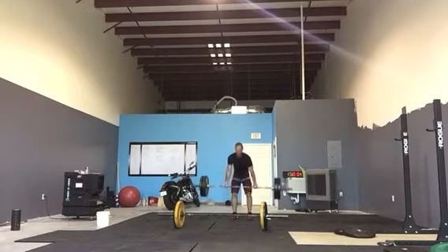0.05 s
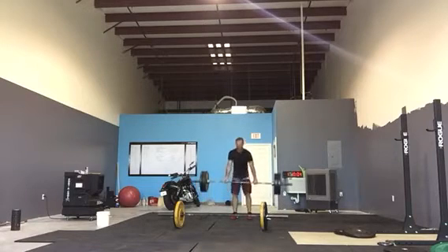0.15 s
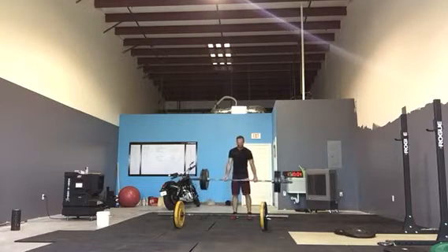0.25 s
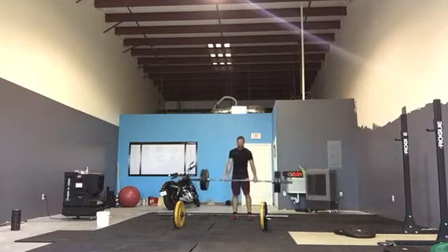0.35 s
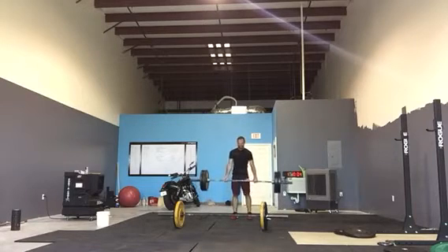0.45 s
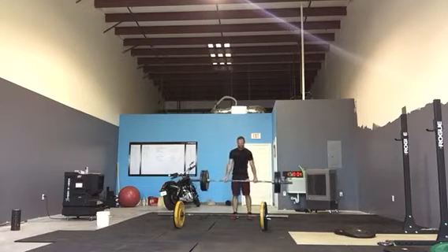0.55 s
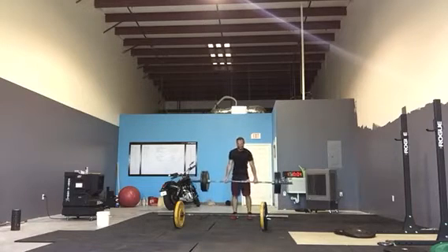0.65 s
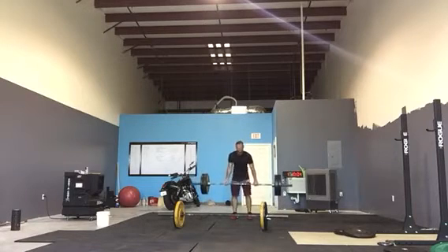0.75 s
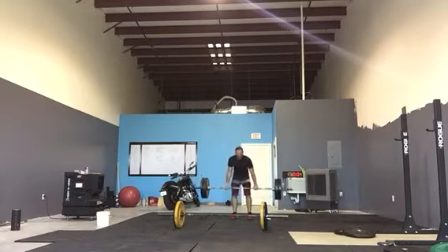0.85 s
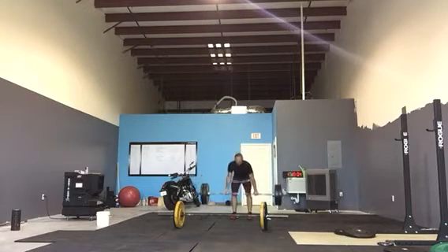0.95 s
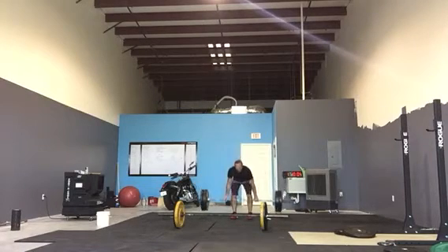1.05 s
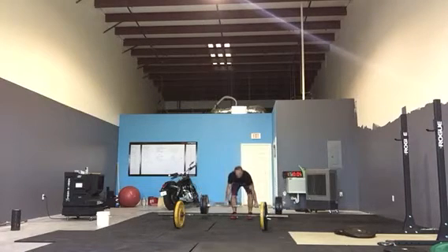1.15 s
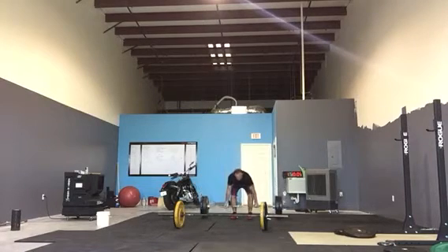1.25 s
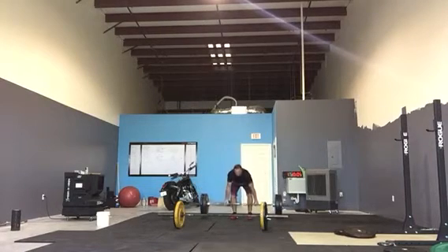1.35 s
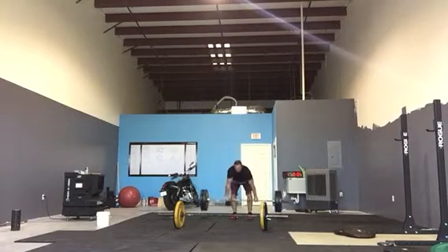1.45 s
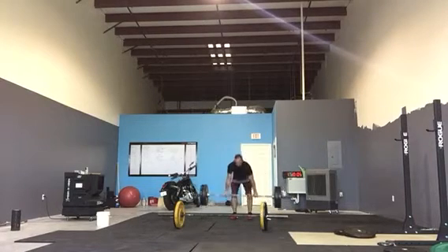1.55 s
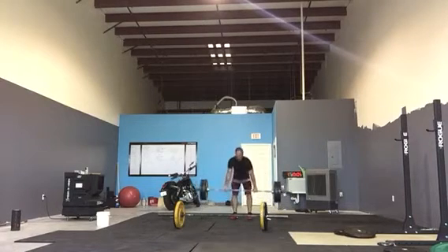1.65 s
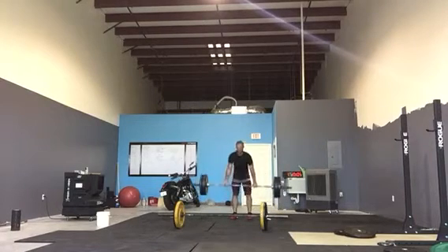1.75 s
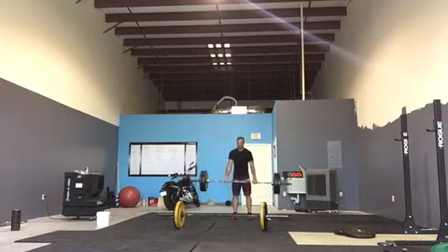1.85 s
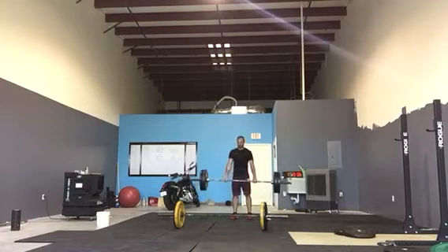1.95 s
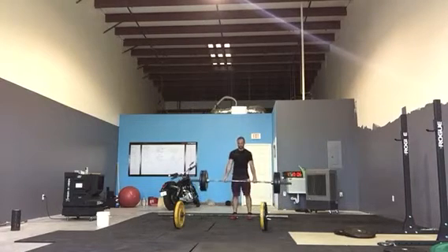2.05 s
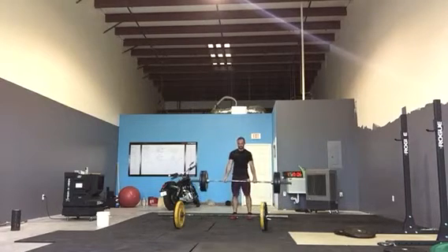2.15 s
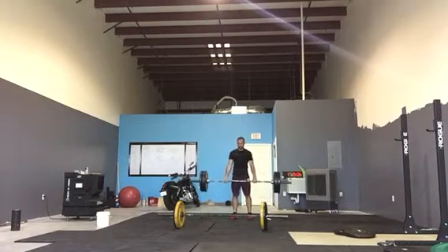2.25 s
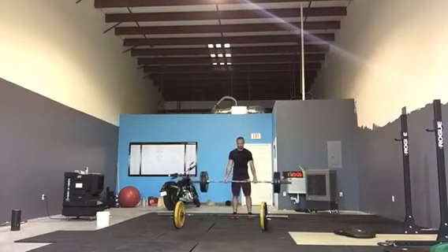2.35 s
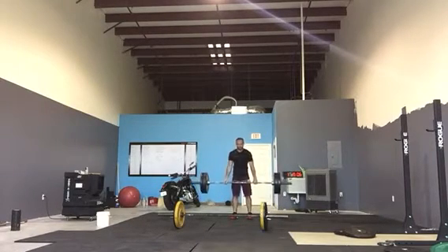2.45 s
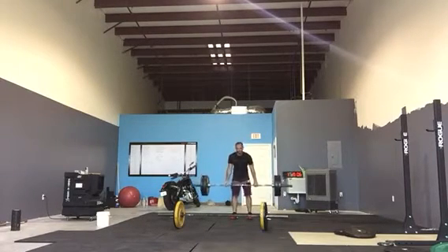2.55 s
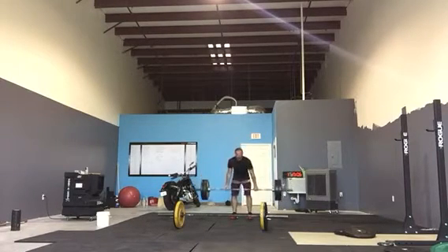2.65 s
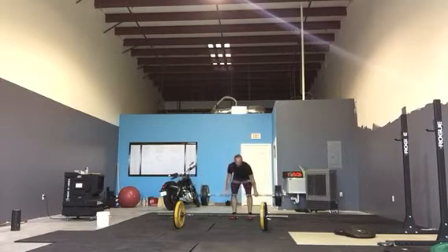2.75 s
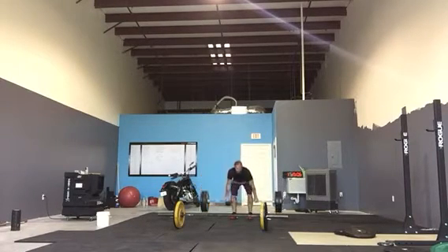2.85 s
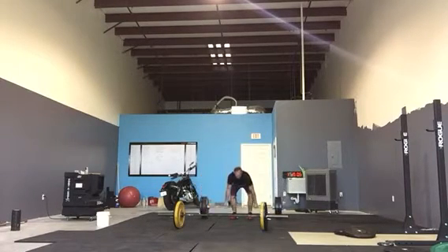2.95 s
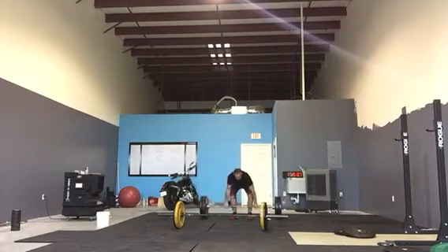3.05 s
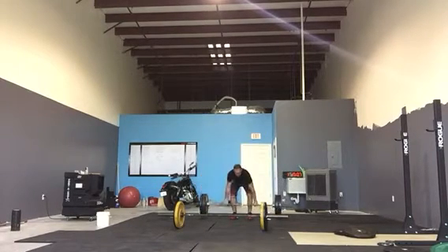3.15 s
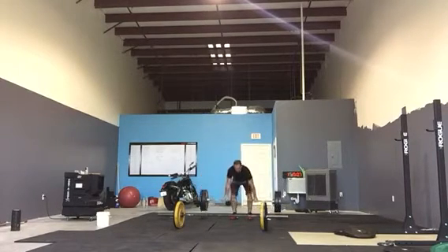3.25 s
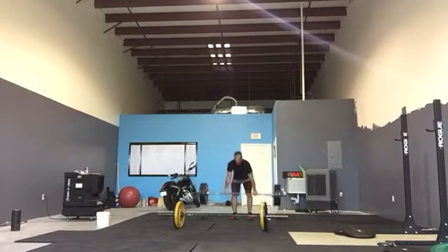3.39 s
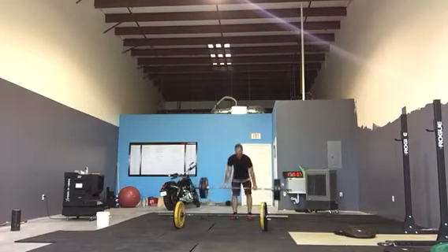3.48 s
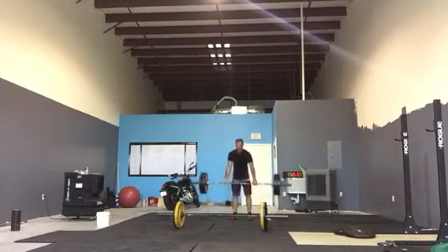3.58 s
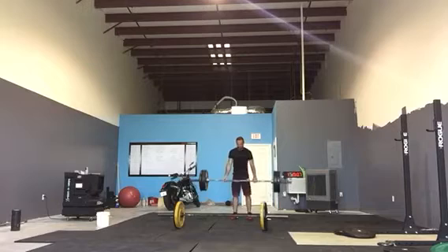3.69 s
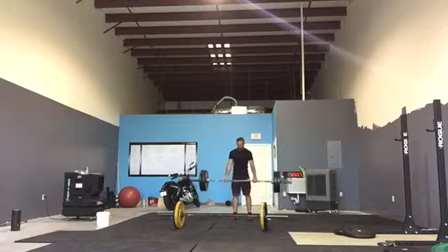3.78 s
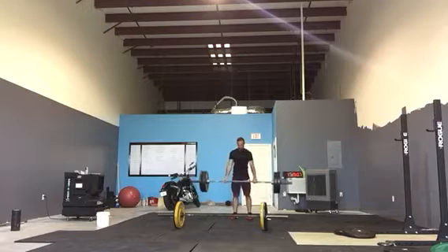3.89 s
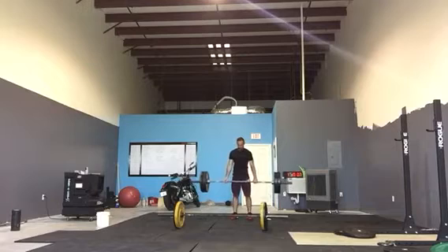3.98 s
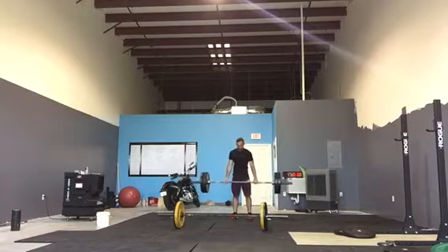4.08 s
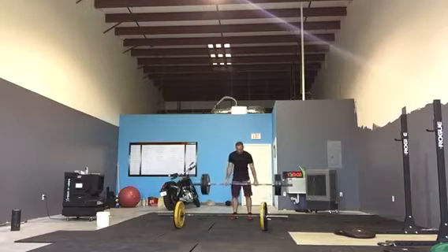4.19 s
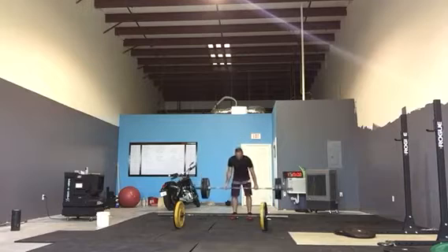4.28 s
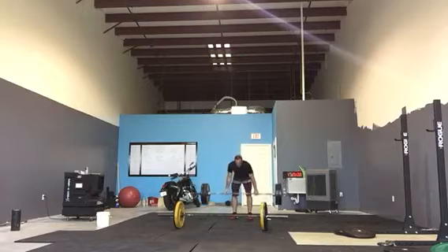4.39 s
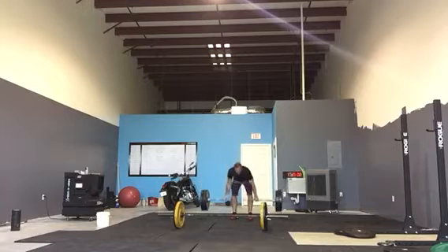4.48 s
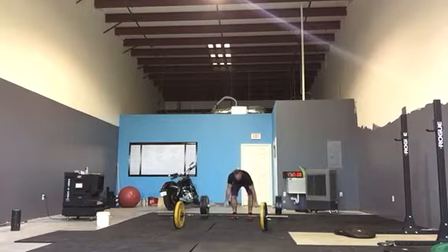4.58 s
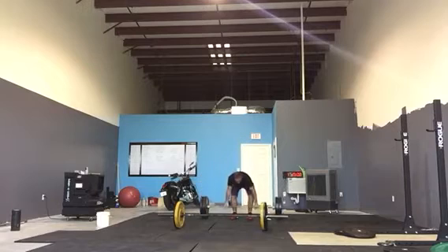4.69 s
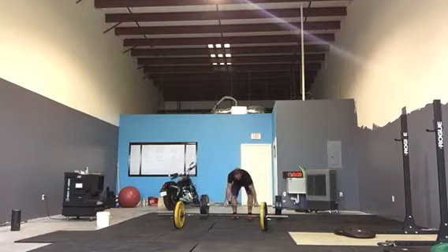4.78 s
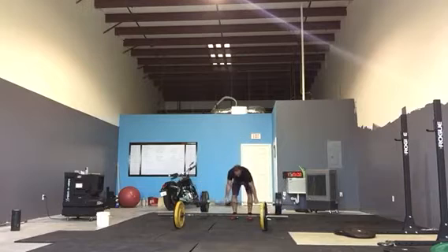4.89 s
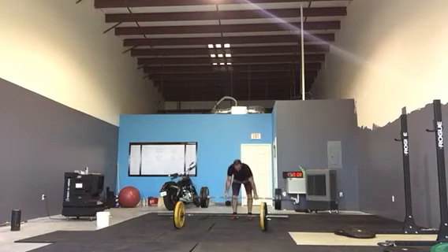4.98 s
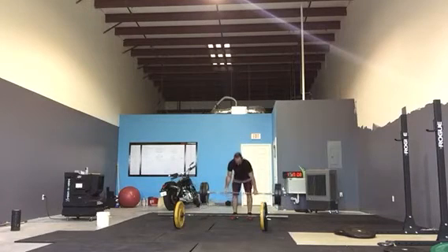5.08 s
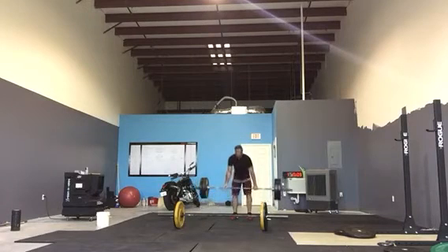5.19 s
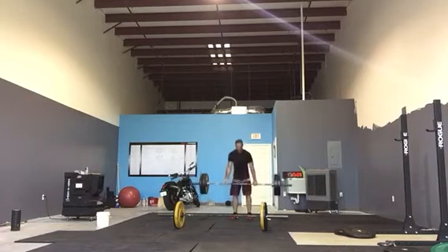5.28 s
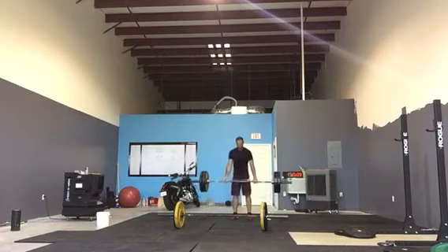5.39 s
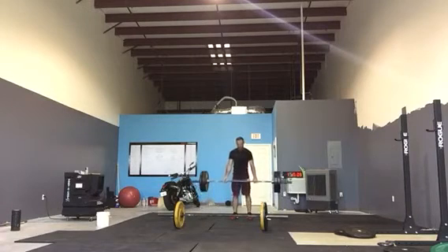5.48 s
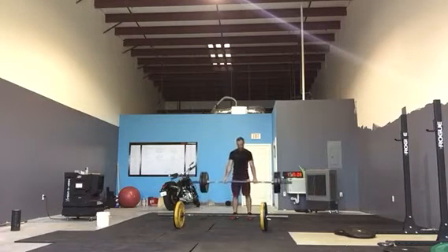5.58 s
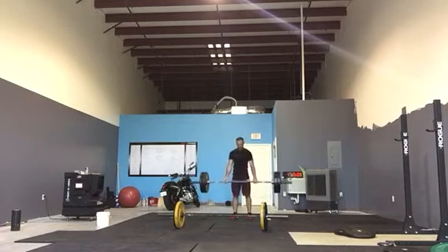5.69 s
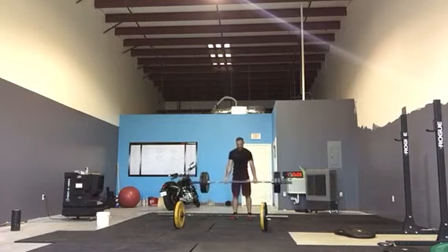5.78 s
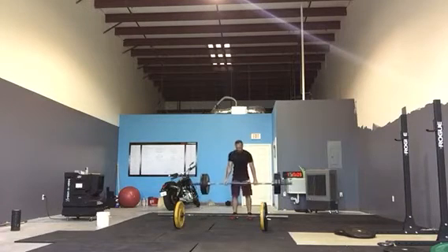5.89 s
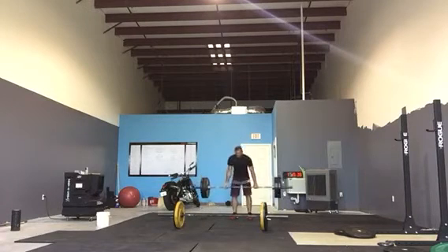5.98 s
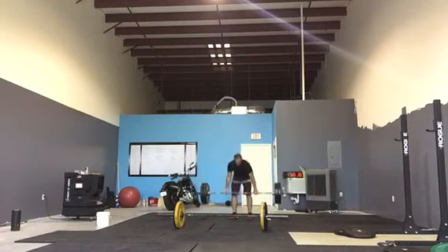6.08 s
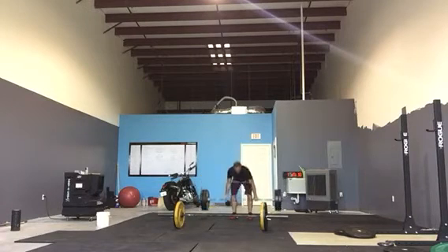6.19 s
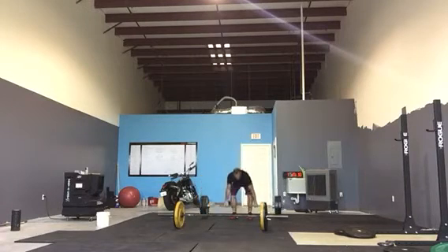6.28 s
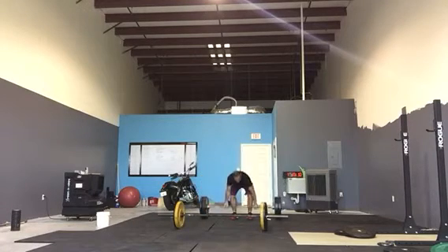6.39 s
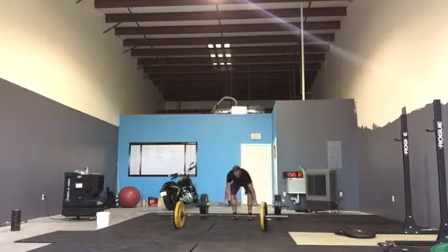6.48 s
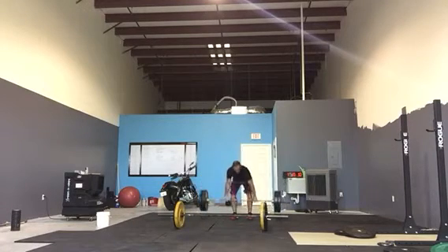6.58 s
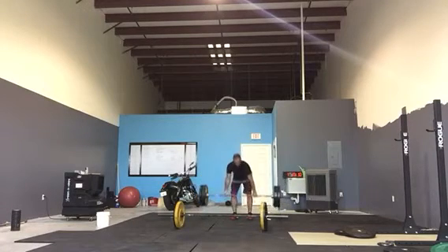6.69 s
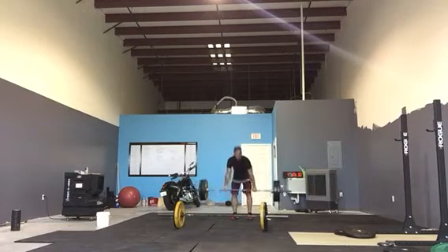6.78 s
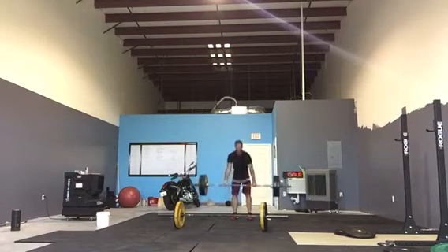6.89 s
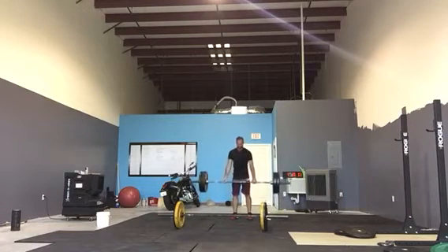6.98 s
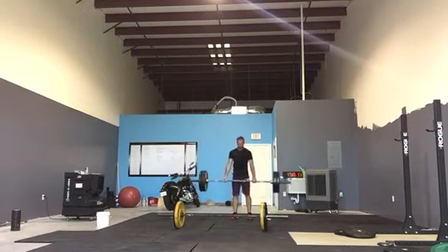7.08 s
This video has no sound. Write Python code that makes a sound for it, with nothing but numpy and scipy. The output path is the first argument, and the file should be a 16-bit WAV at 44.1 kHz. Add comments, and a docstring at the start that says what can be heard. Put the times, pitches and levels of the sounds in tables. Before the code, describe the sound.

Over the drone of a big fan, rubber barbell plates land four times with a thud and a metallic rattle in an echoing gym.

```python
"""A big fan and its motor hum throughout in a long, hard-walled gym.
At 1.3 s a barbell with rubber plates lands on the rubber floor: a graze, then the plates touch
one after another. Hubs rattle on the sleeves, the steel bar rings, and a low thud runs up and
down the hall. Three more landings follow, at 3.1, 4.7 and 6.4 s."""
import sys
import numpy as np
from scipy import signal
from scipy.fft import rfft, irfft
from scipy.io import wavfile

SR = 44100
rng = np.random.default_rng(int(sys.argv[2]) if len(sys.argv) > 2 else 0)


def to_wav(s):
    """Save 16-bit WAV."""
    ch = np.atleast_2d(s).T  # columns
    pcm = np.round(np.clip(ch, -1, 1) * 32767)  # PCM
    wavfile.write(sys.argv[1], SR, pcm.astype(np.int16))


N = 314874
TIME_S = np.arange(N) / SR

# landings: t/s, force/dB, left rattle/dB, right rattle/dB, hardness/(dB/oct), delay stretch, graze/dB
LANDING_EVENTS = [(1.296, -0.45, 0, -6.5, 1, 1.15, -4.5), (3.099, 0, -1.5, 1, -2, .97, 1),
                  (4.7455, 1, 5, 4, -1.5, 1.08, 4.5), (6.449, -0.4, -1, 2.5, -1.5, 1.02, -1.5)]
# touches per landing, graze first: delay/s, clack/dB, left/dB, right/dB, bar/dB, hardness/(dB/oct)
TOUCH_RUN = [(0, -35, -40.5, -42, -49.5, 6), (.0062, -30, -31.5, -35.5, -36.5, 1.5),
             (0.021, -27, -31, -27, -35.5, -4), (.044, -34.5, -28.5, -30.5, -35, -2),
             (.062, -33, -35.5, -29.5, -37.5, -2)]
# dry clack of rubber and steel: f/Hz, relative density/dB
CLACK_SPECTRUM = [(90, -8), (190, 6), (450, -1.5), (750, -5.5), (1100, 0.5), (1550, -3), (2100, 2.5),
                  (2800, 4), (3300, -9.5), (4200, -26.5), (6700, -11.5), (9000, -22), (12000, -39),
                  (15500, -53)]
# steel hubs on each sleeve: f/Hz, level/dB, t60/s
LEFT_HUB_MODES = [(1963, -16, 0.14), (2250, 0, 0.077), (2348, -2.5, 0.077), (2408, -5, 0.034)]
RIGHT_HUB_MODES = [(2485, -5.5, 0.024), (2618, -1, 0.041), (2740, -4.5, 0.016), (2970, -14, 0.02)]
# bending modes of the bar: f/Hz, level/dB
BAR_MODES = [(3400, -15.5), (3700, -15.5), (4140, -25), (4560, -14), (5050, -21), (5490, -12), (5980, -4.5),
             (6330, -2.5), (6460, -1.5), (6910, -1), (7450, -2.5), (7995, 1), (8550, 2), (9090, -3.5),
             (9660, -6.5), (10230, -10.5), (10840, -8), (11470, -8), (12050, -13), (12660, -10.5),
             (13290, -13.5), (13900, -28), (14570, -22), (15230, -18)]
# thud paths, direct and off the end walls: delay/s, level/dB
THUD_ARRIVALS = [(.0075, -5), (0.0759, 1), (0.1475, -5), (.2295, -24)]
# hall reverberation: f/Hz, t60/s
HALL_T60_S = [(100, 1.2), (700, 0.27), (1500, 1.27), (2500, 1.4), (4500, 1.2), (7000, 1.28), (9000, 1.08),
              (11000, 0.96), (15000, 0.6)]
# blade-pass rate: t/s, f/Hz
BLADE_PASS_HZ = [(0, 68.14), (1.6, 68.31), (3.7, 68.79), (4.7, 68.27), (7.14, 68.15)]
# lowest blade tone: t/s, level/dB
THROB_DB = [(0, -47), (0.4, -43.5), (1.0, -51.0), (2.3, -47), (5.1, -45.5), (5.4, -41.5), (7.14, -43.5)]
# higher blade tones: multiple, level/dB, unsteady share 0-1
BLADE_HARMONICS = [(3, -47, 0.84), (4, -43.5, 0.22), (5, -51, 0.75), (6, -51, 0.42), (10, -62, 1)]
# strength of the airflow: t/s, gain/dB
AIRFLOW_DB = [(0, 0.1), (3.9, 0.86), (4.8, -0.6), (7.14, -1)]
# housing resonances: f/Hz, width/Hz, level/dB
HOUSING_MODES = [(83.8, 3.5, -49.5), (253.6, 7.2, -56.5), (309, 4.6, -54.5), (348, 2.8, -57),
                 (632, 22, -60.5), (1675, 21, -58.5)]
# fan rush: f/Hz, relative density/dB
RUSH_SPECTRUM = [(20, -22), (42, -14), (70, -7), (160, -1.5), (300, 1), (460, -5.5), (850, -13),
                 (1150, -12), (1450, -19), (2450, -14), (2780, -19.5), (3150, -36.5), (4000, -52),
                 (8000, -71)]
# motor hum: f/Hz, level/dB
MOTOR_TONES = [(99.3, -56), (120, -46.5), (137.5, -53.5), (240, -54), (1337, -65.5), (1663, -59.5),
               (1699, -63.5), (1977, -72)]
# air hiss: f/Hz, relative density/dB
HISS_SPECTRUM = [(2500, -7), (4800, -7.5), (6600, 3.5), (8500, -3.5), (10500, -8.5), (15500, -16)]


def contacts():
    """Touches of all landings, scaled in force and pace; returns the TOUCH_RUN columns in scene time."""
    rows = []
    for start_s, force_db, left_rattle_db, right_rattle_db, tilt, stretch, graze_db in LANDING_EVENTS:
        for k, (delay_s, clack_db, left_db, right_db, bar_db, touch_tilt) in enumerate(TOUCH_RUN):
            db = force_db + (graze_db if k == 0 else 0)
            rows.append((start_s + stretch * delay_s, db + clack_db, db + left_rattle_db + left_db,
                         db + right_rattle_db + right_db, db + bar_db, tilt + touch_tilt))
    return np.transpose(rows)


def contact_force(times_s, levels_db, decay_s, rise_s):
    """Force envelope: swells as the rubber gives, then dies away."""
    power = np.zeros(N)
    power[np.round(times_s * SR).astype(int)] = from_db(levels_db) ** 2
    fall, rise = np.exp(-2 / (decay_s * SR)), np.exp(-1 / (rise_s * SR))
    return np.sqrt(signal.lfilter([1 - rise], np.poly([fall, rise]), power + 1e-18))


def plates(times_s, levels_db):
    """Rubber plates clack: one noise burst per touch."""
    return noise(CLACK_SPECTRUM) * contact_force(times_s, levels_db, decay_s=0.031, rise_s=0.0055)


def sleeve(modes, times_s, levels_db):
    """Hubs rattle on one end of the bar."""
    force = contact_force(times_s, levels_db, decay_s=0.011, rise_s=0.0014)
    clank = sum(from_db(db - 3) * mode_pair(force, hz, t60_s, split_hz=60) for hz, db, t60_s in modes)
    return signal.sosfilt(signal.butter(2, [1600, 3200], "band", fs=SR, output="sos"), clank)


def bar(times_s, levels_db, hardness_db_oct):
    """Steel bar rings, damped by rubber and hands; hard contacts favour high modes."""
    out = np.zeros(N)
    for hz, db in BAR_MODES:
        tilted_db = levels_db + hardness_db_oct * np.log2(hz / 7000)
        force = contact_force(times_s, tilted_db, decay_s=0.013, rise_s=0.00081)
        out += from_db(db - 7) * mode_pair(force, hz, t60_s=0.055, split_hz=77)
    return out


def mode_pair(force, hz, t60_s, split_hz):
    """Two close modes, one per plane of motion, take up the energy of the chatter."""
    pair = sum(ring(force * chatter(per_s=2700), hz + side * split_hz / 2, t60_s) for side in (-1, 1))
    return unit_rms(pair) * np.sqrt(np.mean(force ** 2))


def chatter(per_s):
    """Tiny random knocks of loose metal, rms 1."""
    return unit_rms((rng.random(N) < per_s / SR) * rng.choice([-1, 1], N))


def ring(drive, hz, t60_s):
    """One damped mode; unit energy per unit click."""
    radius = np.exp(-np.log(1000) / (t60_s * SR))
    feedback = [1, -2 * radius * np.cos(2 * np.pi * hz / SR), radius ** 2]
    gain = np.sqrt((1 - radius ** 2) / 2)
    return signal.lfilter([gain, 0, -gain], feedback, drive + 1e-18)


def thud(hz, length_s, gain_db):
    """Floor and load bounce for a few cycles; the end walls echo it."""
    out = np.zeros(N)
    for start_s, force_db, *_ in LANDING_EVENTS:
        for delay_s, path_db in THUD_ARRIVALS:
            age_s = np.clip(TIME_S - start_s - delay_s, 0, length_s)
            swell = np.sin(np.pi * age_s / length_s) ** 2
            out += from_db(gain_db + force_db + path_db) * swell * np.sin(2 * np.pi * hz * age_s)
    return out


def hall(x, direct_db, early_db, early_t60_s, late_db):
    """Direct sound, dense near reflections and a tail with a t60 per band."""
    age_s = TIME_S[:2 * SR]
    white = rfft(rng.standard_normal(len(age_s)))
    bins_hz = np.fft.rfftfreq(len(age_s), 1 / SR)
    edges_hz = np.geomspace(40, 18000, 25)
    tail = np.zeros(len(age_s))
    for low, high in zip(edges_hz, edges_hz[1:]):
        band = irfft(white * (bins_hz >= low) * (bins_hz < high))
        tail += band * from_db(-60 * age_s / at_hz(HALL_T60_S, np.sqrt(low * high)))
    early = rng.standard_normal(len(age_s)) * from_db(-60 * age_s / early_t60_s)
    response = from_db(early_db) * early / np.linalg.norm(early)
    response += from_db(late_db) * tail / np.linalg.norm(tail)
    return from_db(direct_db) * x + signal.fftconvolve(x, response)[:N]


def fan():
    """Blade tones follow the speed and waver in turbulence; air rushes through the housing."""
    phase = 2 * np.pi * np.cumsum(at_times(BLADE_PASS_HZ)) / SR
    throb = from_db(at_times(THROB_DB)) * tone(phase, unsteady=0.27)
    blades = sum(from_db(db) * tone(k * phase, unsteady) for k, db, unsteady in BLADE_HARMONICS)
    rush = from_db(-40) * noise(RUSH_SPECTRUM)
    return throb + from_db(at_times(AIRFLOW_DB)) * (blades + housing() + rush)


def housing():
    """Air stirs the housing resonances into narrow bands of noise."""
    return sum(from_db(db) * unit_rms(np.real(np.exp(2j * np.pi * hz * TIME_S) * waver(width_hz)))
               for hz, width_hz, db in HOUSING_MODES)


def motor():
    """Hum at set frequencies, each tone wavering a little."""
    return sum(from_db(db) * tone(2 * np.pi * hz * TIME_S, unsteady=0.44) for hz, db in MOTOR_TONES)


def tone(phase, unsteady):
    """Sine with a wavering share, rms about 1."""
    amplitude = np.sqrt(1 - unsteady ** 2) + unsteady * waver(width_hz=4.7)
    return np.sqrt(2) * np.real(np.exp(1j * phase) * amplitude)


def waver(width_hz):
    """Slow random drift of amplitude and phase, rms 1."""
    rate_hz = 1000
    pole = np.exp(-2 * np.pi * width_hz / rate_hz)
    white = rng.standard_normal((2, 12 * rate_hz))
    slow = signal.lfilter([1], [1, -2 * pole, pole ** 2], white[0] + 1j * white[1])
    settled = slow[4 * rate_hz:]
    return unit_rms(np.interp(TIME_S * rate_hz, np.arange(len(settled)), settled))


def noise(spectrum):
    """Coloured noise, rms 1."""
    gain = from_db(at_hz(spectrum, np.fft.rfftfreq(N, 1 / SR)))
    return unit_rms(irfft(rfft(rng.standard_normal(N)) * gain, N))


def at_hz(table, hz):
    """Interpolate over log frequency."""
    known_hz, values = np.transpose(table)
    return np.interp(np.log(hz + 1e-6), np.log(known_hz), values)


def at_times(table):
    """Interpolate over time."""
    return np.interp(TIME_S, *np.transpose(table))


def from_db(db):
    return 10 ** (np.asarray(db) / 20)


def unit_rms(x):
    return x / np.sqrt(np.mean(np.abs(x) ** 2) + 1e-20)


def scene():
    """Barbell several metres away, over fan, motor and faint air hiss; mono."""
    times_s, clack_db, left_db, right_db, bar_db, hardness_db_oct = contacts()
    clack = plates(times_s, clack_db)
    rattle = sleeve(LEFT_HUB_MODES, times_s, left_db) + sleeve(RIGHT_HUB_MODES, times_s, right_db)
    steel = rattle + bar(times_s, bar_db, hardness_db_oct)
    barbell = hall(clack, direct_db=2.5, early_db=-1.5, early_t60_s=0.41, late_db=-4.5)
    barbell += hall(steel, direct_db=0.5, early_db=-8.5, early_t60_s=0.1, late_db=-1.5)
    barbell += thud(hz=72.7, length_s=0.079, gain_db=-25)
    background = fan() + motor() + from_db(-76.5) * noise(HISS_SPECTRUM)
    return (barbell + background)[None]


def record(dry):
    """Short fades at both ends, then a steep low-pass."""
    fade_s, cutoff_hz = 0.004, 15750
    fade = np.clip(np.minimum(TIME_S, TIME_S[::-1]) / fade_s, 0, 1)
    return signal.sosfilt(signal.ellip(12, 0.1, 80, cutoff_hz, fs=SR, output="sos"), dry * fade)


dry = scene()
out = record(dry)
to_wav(out)
```